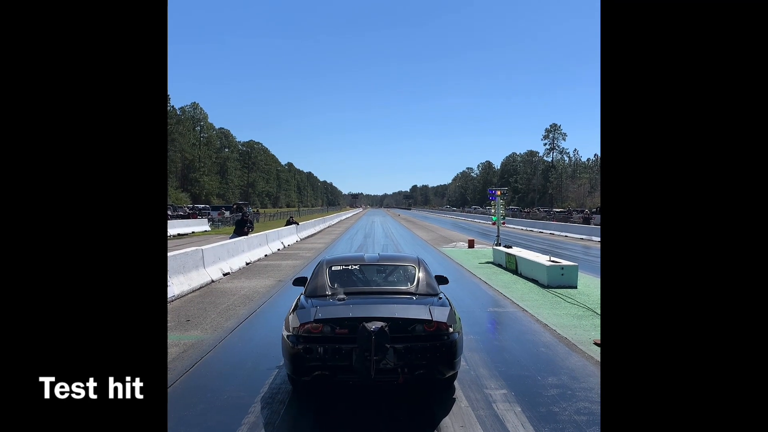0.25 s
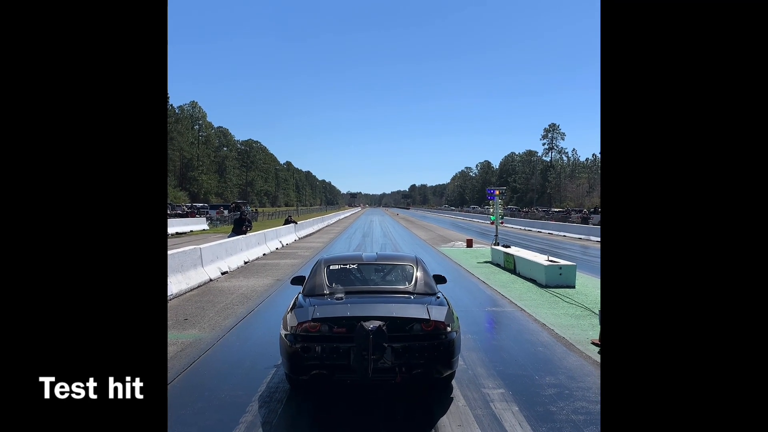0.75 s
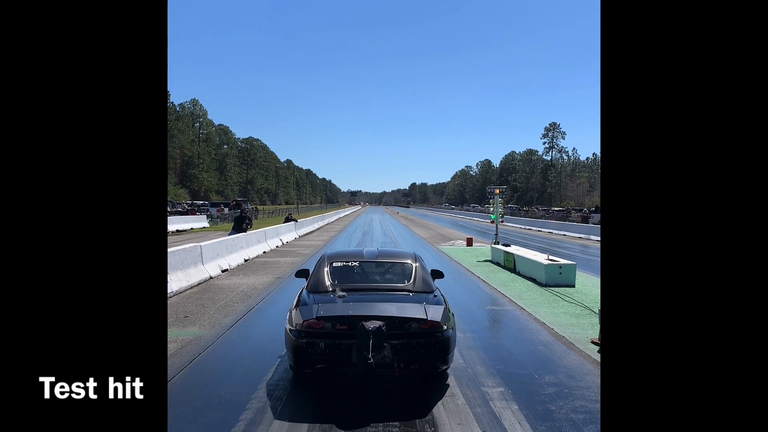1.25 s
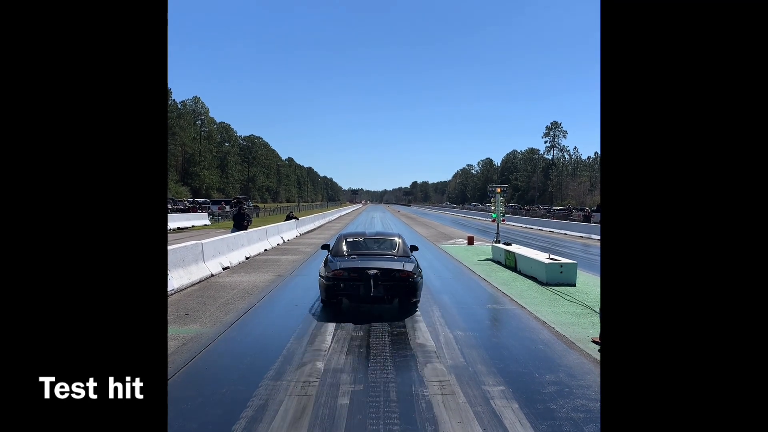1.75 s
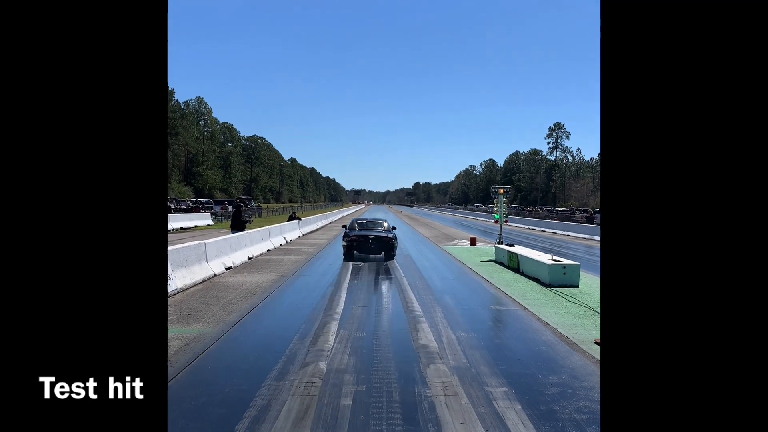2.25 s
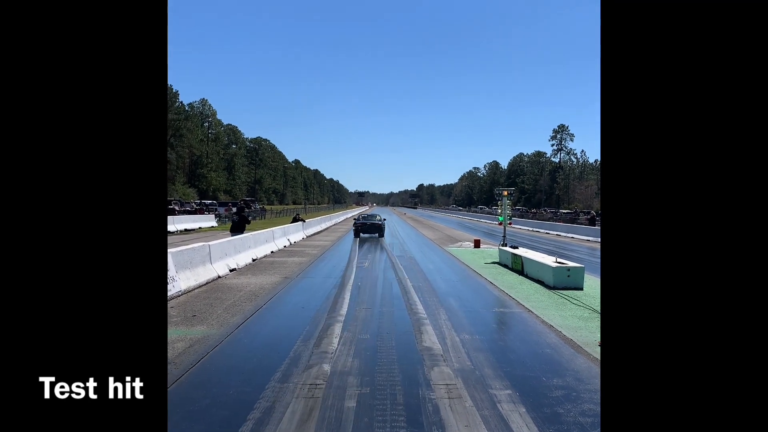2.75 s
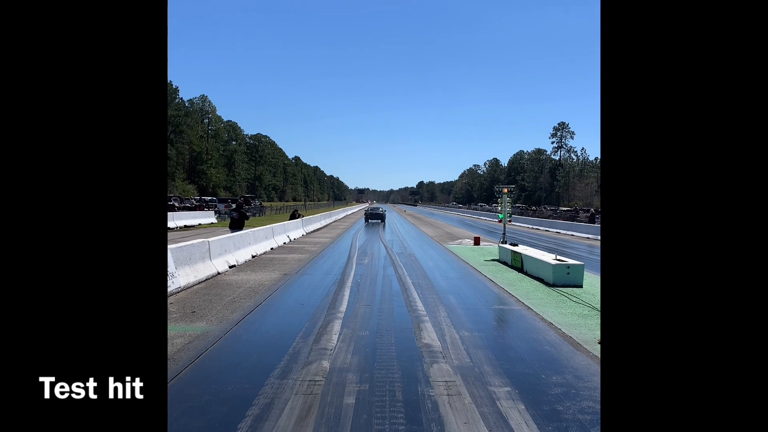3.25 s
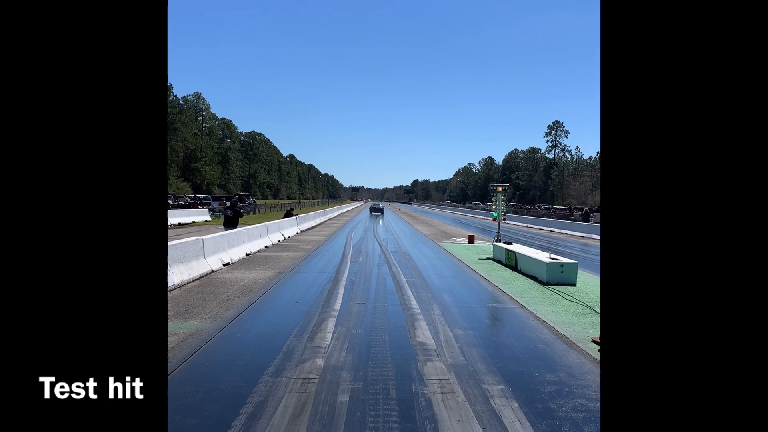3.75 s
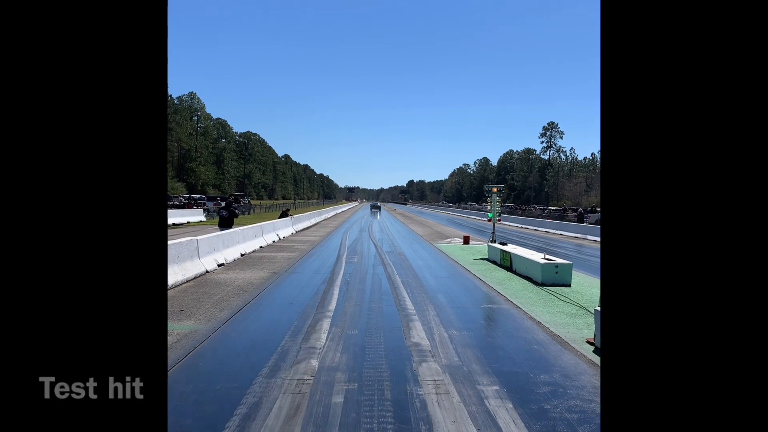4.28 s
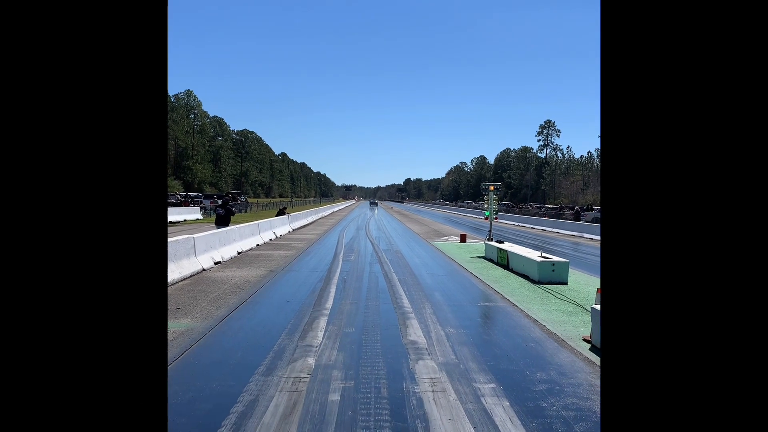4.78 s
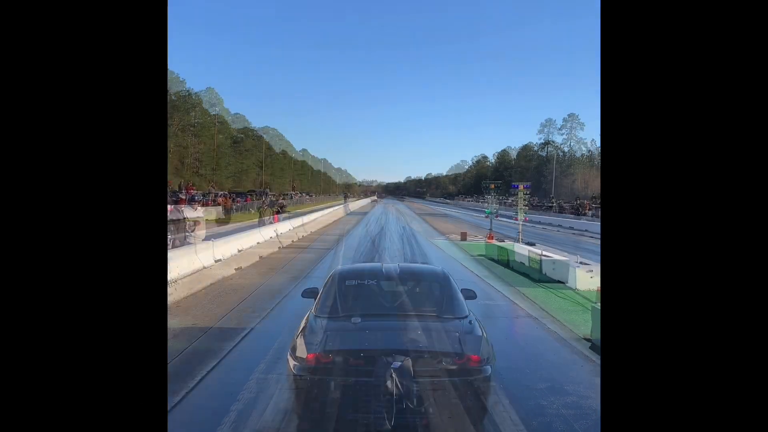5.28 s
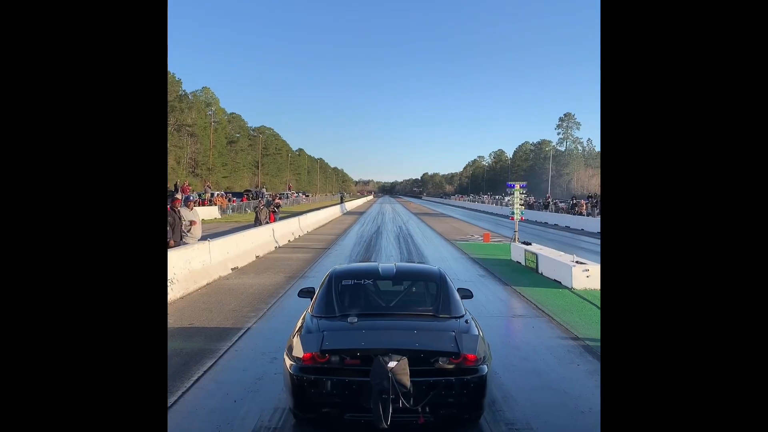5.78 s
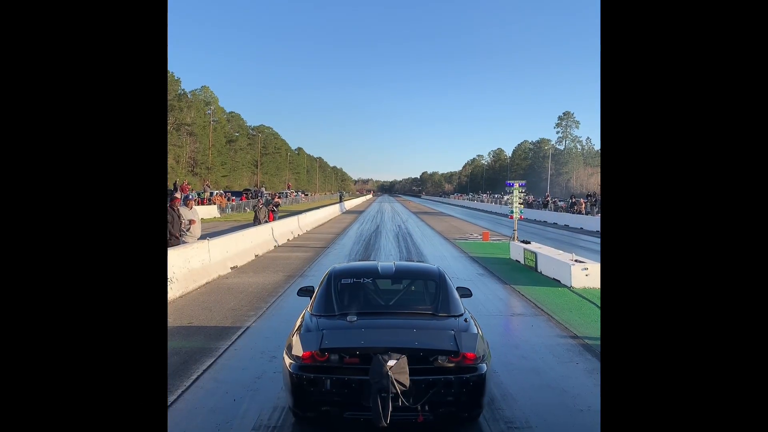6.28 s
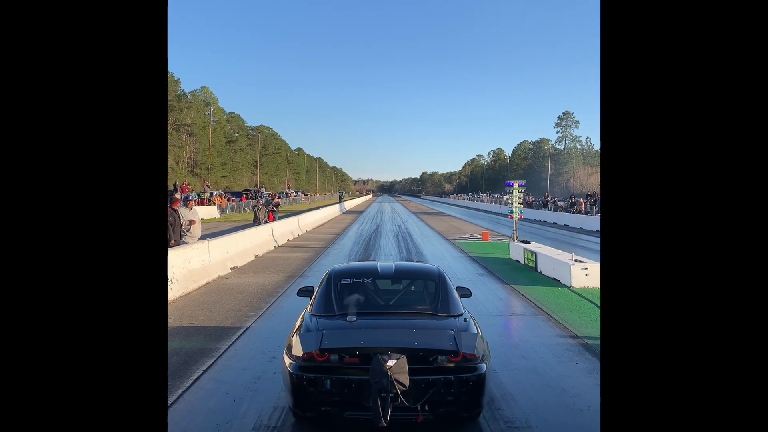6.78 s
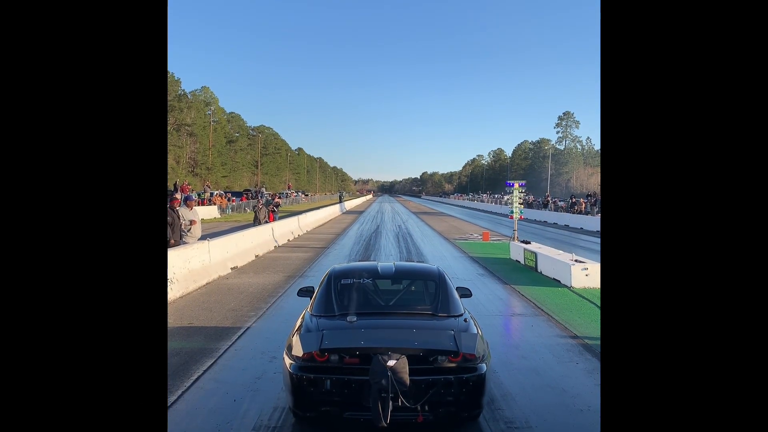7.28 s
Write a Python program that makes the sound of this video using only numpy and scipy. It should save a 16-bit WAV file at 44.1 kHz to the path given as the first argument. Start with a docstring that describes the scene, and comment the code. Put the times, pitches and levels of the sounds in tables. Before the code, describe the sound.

Close behind a drag strip start line, a turbocharged V8 stutters loudly on its limiter, then launches with sharp crackling pops, a raspy roar and climbing thin whistle. It shifts up and dwindles to a distant drone, with a soft wind puff. A second V8 fades in at a lumpy idle, then revs rapidly and holds high.

```python
"""A turbocharged V8 drag car stutters on its launch limiter, leaves with a burst of crackle and a rising
whistle, shifts up and fades down the strip; a second V8 fades in on a lumpy idle and is revved up for launch.
Each exhaust blends firing orders (sines at multiples of the four-stroke cycle) with pulsed, filtered noise,
levelled in four bands. The whistle is a gliding sine, the crackle short noise bursts with thumps, and a puff
of wind is low noise. Everything is heard at two microphone ports just behind the start line."""
import sys
import numpy as np
from scipy import signal
from scipy.fft import rfft, irfft, next_fast_len
from scipy.io import wavfile
from scipy.ndimage import uniform_filter1d, map_coordinates

SR = 44100
rng = np.random.default_rng(int(sys.argv[2]) if len(sys.argv) > 2 else 0)


def unload_audio(sound):
    """Save the sound as a 16-bit wav file, at the path given as the first command line argument."""
    columns = np.transpose(np.atleast_2d(sound))
    # keep every value between -1 and 1, then stretch to whole-number steps
    steps = np.round(np.clip(columns, -1, 1) * 32767)
    wavfile.write(sys.argv[1], SR, steps.astype(np.int16))


N = 332073
TIME = np.arange(N) / SR

# Engine speed of the first car; it climbs, then drops at the shift.
# Each row: time in seconds, mean speed in four-stroke cycles a second.
RUN_SPEED = [(0.0, 37.6), (1.04, 37.9), (1.21, 43.5), (1.39, 46.2), (1.77, 50.5), (2.81, 54.4),
             (3.31, 57.4), (3.45, 52.1), (3.71, 51.2), (5.1, 51.0)]
# Main engine orders of the first car. Each row: multiple of the cycle, then relative level in dB
# on the limiter, just released, pulling away, far off.
RUN_ORDERS = [(2, -7, -19, -22, 4), (3, 5.5, 1, 4, -1), (5, -3, -8.5, -15, -8.5), (6, -10.5, -20, -14, -3),
              (8, -13, -6, -2.5, 11.5), (11, -7.5, -9, -11.5, -40), (13, -6.5, -3, -20, -38),
              (21, -8.5, -15, -34, -31)]
# Strongest firing tone (order 8) of the first car; it breaks after the cracks and returns hard.
# Each row: time in seconds, added level in dB.
FIRING_GAIN = [(1.37, 8.5), (1.65, -12.5), (1.72, 0), (2.2, 0.5), (2.74, 0.5), (2.98, -11)]
# Colour of the first car's exhaust pipe. Each row: frequency in Hz, relative density in dB per Hz.
RUN_PIPE = [(25, -33), (65, -6), (150, -3.5), (230, -6.5), (480, 11), (690, -0.5), (1050, 5.5), (2500, -4),
            (3800, -2.5), (6500, 1), (11000, -5), (15500, -7.5)]
# Ringing of the first car's tailpipe, heard from close behind.
# Each row: centre in Hz, width in Hz, level over the plain flow in dB.
RUN_RING = [(1935, 70, 3), (2115, 45, 1), (2820, 60, 2)]
# Boom, note, rasp and hiss bands of the first car. Each row: lower edge in Hz, upper edge in Hz.
RUN_BANDS = [(20, 230), (230, 750), (750, 3500), (3500, 17000)]
# First car, a row each for boom, note, rasp and hiss: level in dB on the limiter, dB gained at launch,
# dB gained at full boost, dB lost per doubling of distance, dB of the far wash.
RUN_VOICES = [(-13.5, -6.5, 4.5, 30.5, -38.5), (-17, 0.5, 2.5, 15.5, -31.5), (-26, -2.5, 5.5, 10.5, -45.5),
              (-29.5, -0.5, 11, 13.5, -82)]
# Surges and sags of load: bite of the tyres, bog, full roar, its crackling peak, last pull, gear shift.
# Each row: middle in seconds, half length in seconds, gain in dB of boom, note, rasp and hiss,
# added roughness from 0 to 1.
LOAD_SURGES = [(1.379, 0.073, 0.5, 0, 3, 1, 0.4), (1.554, 0.1, -1, -3.5, -2, -7.5, 0.4),
               (2.07, 0.15, -3, 0.5, 8, 5.5, 0.16), (2.304, 0.1, -5, 0, 5, 6, 0.24),
               (2.667, 0.19, -1, 2.5, 4.5, 1, 0.09), (3.45, 0.41, 0.5, 3, 4, 2.5, 0.22)]
# Exhaust cracks. Each row: start in seconds, burst level in dB before its colour, thump level in dB.
CRACKS = [(1.355, -16, -18), (1.369, -9, -12), (1.393, -11, -15), (1.413, -13, -16), (1.705, -14, -18)]
# Colour of the crack bursts. Each row: frequency in Hz, gain in dB.
CRACK_COLOUR = [(300, 6), (750, 14), (1100, 5.5), (3100, -1), (15000, -11)]
# First car at the two ports. Each row: frequency in Hz, phase in radians by which the left leads.
RUN_PHASE = [(100, 0), (200, -.3), (300, -.9), (450, -.3), (650, -1.2), (1700, 0), (2700, 1)]
# First car at the two ports. Each row: frequency in Hz, left minus right level in dB.
RUN_BALANCE = [(60, 3.5), (350, 1.1), (2000, 0)]

# Engine speed of the second car, from idle up to launch revs.
# Each row: time in seconds, mean speed in four-stroke cycles a second.
STAGE_SPEED = [(6.21, 9.1), (6.29, 10.0), (6.35, 12.4), (6.45, 17.5), (6.55, 23.2), (6.62, 26.6),
               (6.7, 28.5), (6.9, 30.5), (7.156, 31.9), (7.52, 33.5)]
# Exhaust note of the second car. Each row: time in seconds, state (0 idling, 1 throttle opening,
# 2 revving, 3 held high).
STAGE_STATE = [(6.18, 0), (6.28, 1), (6.58, 1), (6.72, 2), (7.12, 2), (7.36, 3)]
# Main engine orders of the second car. Each row: multiple of the cycle, then relative level in dB
# idling, as the throttle opens, revving, held high.
STAGE_ORDERS = [(3, -25, -23, -9.5, -9.5), (5, -7.5, -5.5, -5, -4.5), (8, 2, 5.5, -5, 0),
                (10, -5.5, -25, -12, -10), (11, 1.5, -9.5, -9.5, -9.5), (13, 0, -15, -5.5, 0.5),
                (16, -17, -11.5, 0.5, -3.5)]
# Colour of the second car's exhaust pipe. Each row: frequency in Hz, relative density in dB per Hz.
STAGE_PIPE = [(25, -6), (80, 21), (290, -6.5), (500, 5), (620, -7), (1000, 4.5), (1600, 6.5), (3700, -6),
              (7000, -10), (15500, -17)]
# Ringing of the second car's tailpipe. Each row: centre in Hz, width in Hz, dB over the plain flow.
STAGE_RING = [(894, 16, 2.5), (1320, 37, 8), (3590, 99, 0)]
# Boom, note, rasp and hiss bands of the second car. Each row: lower edge in Hz, upper edge in Hz.
STAGE_BANDS = [(20, 300), (300, 750), (750, 3000), (3000, 17000)]
# Second car, a row each for boom, note, rasp and hiss: level in dB idling, dB gained with the throttle
# open, dB gained at high revs, dB gained during the run-up, dB gained when held high.
STAGE_VOICES = [(-11.5, 4.5, -8, 0.5, 4), (-25.5, 9, 2.5, 2.5, -0.5), (-37.5, 10, -3, 1.5, 0),
                (-40, 9.5, 0.5, 1.5, -0.5)]
# The second car stumbles into a rough bark.
# Each row: middle in seconds, half length in seconds, gain in dB, added roughness from 0 to 1.
BARKS = [(6.436, .035, 0.5, 0.2), (7.122, 0.092, 1.5, 0.01)]
# Second car at the two ports. Each row: frequency in Hz, phase in radians by which the left leads.
STAGE_PHASE = [(40, 0), (215, -3.1), (260, -4.4), (430, -5.9), (620, -6), (760, -5), (830, -1.8),
               (1100, -.7), (1700, 0), (2700, 1.8)]
# Second car at the two ports. Each row: frequency in Hz, left minus right level in dB.
STAGE_BALANCE = [(60, 0.5), (350, 5), (2000, 0.5)]

# Both cars in the treble. Each row: frequency in Hz, phase in radians by which the left leads.
TREBLE_PHASE = [(3700, 1.8), (4750, np.pi), (17270, 7 * np.pi)]
# How the eight cylinders differ: one relative deviation (no unit) each, in firing order.
CYLINDERS = np.array([1, -1, 0, 1, -1, 1, 0, -1])

BANK_DB = 2.5  # uneven firing of each bank favours some upper orders, in a pattern repeating every eight
LAUNCH_AT_S, RELEASE_S = 1, 0.16  # the first car comes off its limiter
CUT_SHARE, CUT_DB = .2, 5  # limiter: share of the sparks cut, depth of a gap
ACCEL_M_S2, NEAR_M = 9.05, 7.74  # first car's pull, and the distance beyond which it fades
BOOST_AT_S, SPOOL_S = 1.206, 0.72  # the turbo spools up
WHISTLE_HZ, WHISTLE_RISE_HZ, WHISTLE_SAG_HZ_PER_S = 5900, 3900, 45
WHISTLE_DB, WHISTLE_SAG_DB_PER_S = -32, 9  # on the limiter, and its fading there
WHISTLE_SPOOL_DB, WHISTLE_BOOST_DB = 4.5, 14  # gained as it spools, gained further at full boost
WHISTLE_LOSS_DB = 28  # per doubling of distance
CRACK_S, THUMP_S = .014, .003  # time constants
BUFFET_AT_S, BUFFET_S, BUFFET_DB = 4.33, 0.079, -33.5  # middle, half length, level before the final trim
FADE_AT_S, FADE_S = 5.044, 0.37  # the first car fades out as the second fades in
THROTTLE_AT_S, THROTTLE_S = 6.25, .17
FLARE_AT_S, FLARE_S = 6.42, 0.077  # middle and time constant of the second car's run-up
IDLE_HUNT = .025  # how far its idle speed hunts (share)
IDLE_ROUGH, HIGH_ROUGH, FLARE_ROUGH = .15, .08, .1  # base noise share, weighted in each band
TOP_HZ = 15900  # band limit


def amp(db):
    """Level law: decibels to gain."""
    return 10 ** (np.asarray(db) / 20)


def along(points, hz):
    """Interpolation on a logarithmic frequency axis through (Hz, value) points."""
    f, v = np.transpose(points)
    return np.interp(np.log(hz + 1), np.log(f), v)


def curves(rows):
    """Linear interpolation in time: one value per sample for each column after the time."""
    s, *cols = np.transpose(rows)
    return [np.interp(TIME, s, c) for c in cols]


def wobble(rate, times=TIME):
    """Slow random modulation: a smooth curve through rate random knots a second."""
    coarse = TIME[::64]
    knots = rng.standard_normal(4096)
    return np.interp(times, coarse, map_coordinates(knots, [coarse * rate], mode="wrap"))


def ramp(start, length):
    """Linear transition from 0 to 1."""
    return np.clip((TIME - start) / length, 0, 1)


def swell(middle, half):
    """Flat-topped envelope of height 1."""
    return np.exp(-((TIME - middle) / half) ** 4)


def filtered(x, response):
    """Linear filtering: the spectrum of x times a complex response of frequency."""
    m = next_fast_len(N + SR // 4, True)
    return irfft(rfft(x, m) * response(np.fft.rfftfreq(m, 1 / SR)), m)[..., :N]


def band(x, lo, hi):
    """Band-pass filtering, with the slow level of the band held at rms 1."""
    y = filtered(x, lambda hz: ((1 + (lo / (hz + 1)) ** 12) * (1 + (hz / hi) ** 12)) ** -.5)
    power = np.abs(uniform_filter1d(y * y, size=7000))
    return y / np.sqrt(power + 1e-12)


def first_car():
    """Spreading and absorption: held, then away; far off, air takes the treble and the bass blurs."""
    speed, = curves(RUN_SPEED)
    turns = np.cumsum(speed * (1 + 0.0021 * wobble(12))) / SR
    away = ramp(LAUNCH_AT_S, RELEASE_S)
    boost = 1 - np.exp(-np.maximum(TIME - BOOST_AT_S, 0) / SPOOL_S)
    metres = ACCEL_M_S2 * np.maximum(TIME - LAUNCH_AT_S - RELEASE_S / 2, 0) ** 2 / 2
    doublings = np.log2(np.hypot(1, metres / NEAR_M))

    *surge_db, strain = sum(np.outer(gains, swell(s, half)) for s, half, *gains in LOAD_SURGES)
    levels = []
    for (held, launch, boosted, loss, wash), surge in zip(RUN_VOICES, surge_db):
        direct = amp(held + launch * away + boosted * boost - loss * doublings)
        levels.append(amp(surge) * np.hypot(direct, amp(wash)))
    firing_db, = curves(FIRING_GAIN)
    levels[1] = levels[1] * amp(0.19 * firing_db)  # the note follows its strongest partial
    levels[2] = levels[2] * amp(1.6 * away * (1 - ramp(2.7, .5)) * wobble(55))  # the rasp flickers

    # position along the level columns of RUN_ORDERS
    state = np.interp(TIME, [1.04, 1.17, 1.36, 1.55, 2.9, 3.5], [0, 1, 1, 1.9, 2.6, 3.2])
    far = np.maximum(state - 2, 0)
    rough = .07 * (1 - away) + .04 * away + .06 * np.minimum(doublings, 2) + strain
    unrest = 0.5 * (1 - away) + 0.19 * away
    tone = exhaust_tone(turns, RUN_ORDERS, state, RUN_PIPE, unrest, unrest_rate=32, upper_db=-20,
                        upper_unrest=.6, count=48, firing_db=firing_db[::8])
    noise = gas(turns, RUN_PIPE, puff=1.0, uneven_db=1.0, crackle=0.86, crackle_s=0.016)
    noise = noise + amp(4 - 4 * away) * blowdown(turns, RUN_PIPE, lag=.12, jitter=.03, misfire_db=4)
    noise = noise + (1 - away) * ringing(noise, RUN_RING)
    noise = (1 - far) * noise + far * filtered(noise, lambda hz: np.exp(-hz / 12000))
    levels[:3] = levels[:3] * stutter(turns, 1 - away)
    noise_shares = [rough * (1.3 - away) + 0.5 * far, rough, 0.63 + 0.032 * far, 1]
    car = voice(tone, noise, levels, noise_shares, RUN_BANDS)
    fade = 1 - ramp(FADE_AT_S, FADE_S)
    source = fade * (car + turbo(boost, doublings) + cracks())
    return ports(source, RUN_PHASE, RUN_BALANCE, diffuse_db=-10)


def exhaust_tone(turns, orders, state, pipe, unrest, unrest_rate, upper_db, upper_unrest, count, firing_db=0):
    """Harmonic series: main orders follow engine state; upper ones glide through pipe resonances."""
    turns, state, unrest = turns[::8], state[::8], unrest[::8]  # an eighth of the sample rate suffices
    full_rate = lambda x: signal.resample_poly(x, 8, 1)[:N]
    main = 0
    for k, *db in orders:
        shake = unrest * (1 + 2.4 * (round(k) < 6))  # misfires disturb the low orders most
        size = np.interp(state, np.arange(len(db)), amp(db))
        if round(k) == 8:
            size = size * amp(firing_db)
        main = main + size * partial(round(k) * turns, shake, unrest_rate)
    main_orders = np.round(orders)[:, 0]
    upper = 0
    for k in range(12, count):
        if k not in main_orders:
            size = amp(BANK_DB * np.cos(3 * np.pi * k / 4) + rng.normal(0, 1))
            upper = upper + size * partial(k * turns, unrest + upper_unrest, unrest_rate)
    coloured = filtered(full_rate(upper), lambda hz: amp(along(pipe, hz)))
    return full_rate(main) + amp(upper_db) * coloured


def partial(turns, shake, rate):
    """Random modulation of one order: uneven combustion shakes it in size and phase."""
    angle = 2 * np.pi * (turns + rng.random())
    size = shake * wobble(rate, TIME[::8])
    slip = shake * wobble(rate, TIME[::8])
    return ((1 + size) * np.sin(angle) + slip * np.cos(angle)) / np.sqrt(1 + 2 * shake ** 2)


def gas(turns, pipe, puff, uneven_db, crackle, crackle_s):
    """Flow noise: turbulence puffs once per firing, from unequal cylinders, and tears into crackles."""
    firing = 8 * turns
    index = firing.astype(int)
    cylinders = CYLINDERS[index % len(CYLINDERS)]
    strength = amp(uneven_db * (cylinders + rng.standard_normal(8192)[index % 8192]))
    puffs = puff * strength * np.exp(-2 * (firing % 1))
    shocks = (rng.random(N) < 90 / SR) * rng.random(N) ** 2  # about 90 a second
    tears = signal.lfilter([crackle], [1, -np.exp(-1 / (crackle_s * SR))], shocks)
    flow = (1 + puffs + tears) * amp(.7 * wobble(22))
    return filtered(rng.standard_normal(N) * flow, lambda hz: amp(along(pipe, hz)))


def blowdown(turns, pipe, lag, jitter, misfire_db):
    """Impulsive excitation: an uneven pressure pulse per opening exhaust valve, no two burns alike."""
    firing = 8 * turns
    k = np.arange(1, int(firing[-1]) - 1)
    slip, size = rng.standard_normal((len(k), 2)).T
    moment = k + lag * CYLINDERS[k % len(CYLINDERS)] + jitter * slip
    at = np.interp(moment, firing, np.arange(N)).astype(int)
    pulses = np.bincount(at, amp(misfire_db * np.tanh(size)), N)
    pulses = pulses / np.sqrt(np.gradient(firing))  # keeps the power steady as the firing rate changes
    pulses = signal.lfilter(*signal.butter(2, [260, 1900], "band", fs=SR), pulses)
    return filtered(pulses, lambda hz: amp(along(pipe, hz)))


def ringing(x, modes):
    """Resonance: what the pipe's narrow modes add to the flow."""
    mode = lambda f, c, w: 1j * f * w / (c * c - f * f + 1j * f * w)
    return filtered(x, lambda f: sum(amp(db) * mode(f, c, w) for c, w, db in modes))


def stutter(turns, held):
    """Gating: the launch limiter cuts the spark of a few cylinders in a row, at random, leaving gaps."""
    cut = (rng.random(2048) < CUT_SHARE)[(3 * turns).astype(int)]  # three chances a cycle
    return amp(-CUT_DB * held * (uniform_filter1d(cut * 1., size=180) - CUT_SHARE / 2))


def voice(tone, noise, levels, noise_shares, bands):
    """Power summation: boom, note, rasp and hiss, each a blend of firing tone and turbulence."""
    out = np.zeros(N)
    for (lo, hi), level, share in zip(bands, levels, noise_shares):
        share = np.clip(share, 0, 1)
        out += level * np.sqrt(share) * band(noise, lo, hi)
        if np.min(share) < 1:
            out += level * np.sqrt(1 - share) * band(tone, lo, hi)
    return out


def turbo(boost, doublings):
    """Blade-passing tone: it sags on the limiter, swells and climbs with boost, flutters in hot air."""
    held = np.minimum(TIME, BOOST_AT_S)
    hz = WHISTLE_HZ - WHISTLE_SAG_HZ_PER_S * held + WHISTLE_RISE_HZ * boost
    db = WHISTLE_DB - WHISTLE_SAG_DB_PER_S * held + WHISTLE_SPOOL_DB * ramp(BOOST_AT_S, 0.023)
    db = db + WHISTLE_BOOST_DB * boost - WHISTLE_LOSS_DB * doublings
    flutter = (.003 + .005 * ramp(BOOST_AT_S, .05)) * wobble(250) + .001 * wobble(11)
    angle = 2 * np.pi * np.cumsum(hz * (1 + flutter)) / SR
    return amp(db + 2.5 * wobble(41)) * np.sin(angle)


def cracks():
    """Impulsive combustion: unburnt fuel pops in the hot pipe, a broad burst and a low push of air."""
    bursts = sum(amp(db) * (TIME >= s) * np.exp(-np.abs(TIME - s) / CRACK_S) for s, db, _ in CRACKS)
    thumps = 0
    for s, _, db in CRACKS:
        age = np.maximum(TIME - s, 0) / THUMP_S
        thumps = thumps + amp(db) * 2 * age * (2 - age) * np.exp(-age)  # a push, then a pull
    return thumps + filtered(bursts * rng.standard_normal(N), lambda hz: amp(along(CRACK_COLOUR, hz)))


def ports(x, phase, balance, diffuse_db):
    """Interaural-like differences: phase and level differ by port; scattered treble is unrelated."""
    lead = lambda hz: np.interp(hz, *np.transpose(phase + TREBLE_PHASE))
    half = lambda hz: np.exp(.5j * lead(hz)) * amp(along(balance, hz) / 2)
    t = TIME[:SR // 5]
    tail = rng.standard_normal((2, len(t))) * amp(-60 * t / 0.069)  # falls 60 dB in 0.069 s
    # walls and restless air scatter the treble
    scatter = signal.fftconvolve(x[None], tail / np.linalg.norm(tail[0]), axes=1)[:, :N]
    scatter = signal.lfilter(*signal.butter(1, 700, "high", fs=SR), scatter) * [wobble(130), wobble(130)]
    direct = filtered(x, lambda hz: half(hz) ** np.array([[1], [-1]]))
    return direct + amp(diffuse_db) * scatter


def buffet():
    """Wind pressure on the microphone: a soft low thud, different at each port."""
    return amp(BUFFET_DB) * swell(BUFFET_AT_S, BUFFET_S) * band(rng.standard_normal((2, N)), 35, 82)


def second_car():
    """Firing regularity: a loping idle runs up roughly on open throttle, then fires clean and hard."""
    throttle = ramp(THROTTLE_AT_S, THROTTLE_S)
    revs = 1 / (1 + np.exp(-(TIME - FLARE_AT_S) / FLARE_S))
    flare = 4 * revs * (1 - revs)  # peaks midway through the run-up
    idling = 1 - revs
    speed, = curves(STAGE_SPEED)
    turns = np.cumsum(speed * (1 + (.002 + IDLE_HUNT * (1 - throttle)) * wobble(13))) / SR
    high = ramp(FLARE_AT_S - .1, 0.48)
    state, = curves(STAGE_STATE)
    top = np.maximum(state - 2, 0)

    bark_db, strain = sum(np.outer(gains, swell(s, half)) for s, half, *gains in BARKS)
    levels = []
    for idle, opened, revved, run_up, held in STAGE_VOICES:
        db = idle + opened * throttle + revved * high + run_up * flare + held * top
        levels.append(amp(db + bark_db))
    rough = IDLE_ROUGH * (1 - high) + HIGH_ROUGH * high + FLARE_ROUGH * flare + strain
    unrest = 0.39 * (1 - throttle) + 0.19 * throttle
    tone = exhaust_tone(turns, STAGE_ORDERS, state, STAGE_PIPE, unrest, unrest_rate=20, upper_db=-17,
                        upper_unrest=.12, count=78)
    noise = gas(turns, STAGE_PIPE, puff=.2 + .6 * revs, uneven_db=2.5, crackle=0.5, crackle_s=0.01)
    noise = noise + amp(9 * revs - 7) * blowdown(turns, STAGE_PIPE, lag=.12, jitter=.02, misfire_db=4)
    noise = noise + (1 + throttle) / 2 * ringing(noise, STAGE_RING)
    tone = tone + throttle * ringing(tone, STAGE_RING)
    # the deep throb thins out with the revs
    noise = idling * noise + revs * filtered(noise, lambda hz: hz ** 2 / (hz ** 2 + 90 ** 2))
    lope = amp(idling * (.8 * np.sin(2 * np.pi * turns) + 1.3 * wobble(20)))
    noise_shares = [1.07 * rough, 2.6 * rough + .5 * idling, 0.2 + 0.7 * idling, 1]
    car = voice(tone, noise * lope, levels, noise_shares, STAGE_BANDS)
    return ports(ramp(FADE_AT_S, FADE_S) * car, STAGE_PHASE, STAGE_BALANCE, diffuse_db=-9.0)


def scene():
    """Superposition: one car after the other, with a puff of wind before the second fades in."""
    return amp(-1.83) * (first_car() + second_car() + buffet())


def record(dry):
    """Saturation and band limiting: peaks are rounded, the level dips briefly once, the top is cut."""
    dip = np.interp(TIME, [7.069, 7.072, 7.096, 7.098], [1, .02, .02, 1])
    rounded = dry / (1 + np.abs(dry / .95) ** 6) ** (1 / 6)
    return filtered(rounded * dip, lambda hz: hz < TOP_HZ)


dry = scene()
out = record(dry)
unload_audio(out)
```